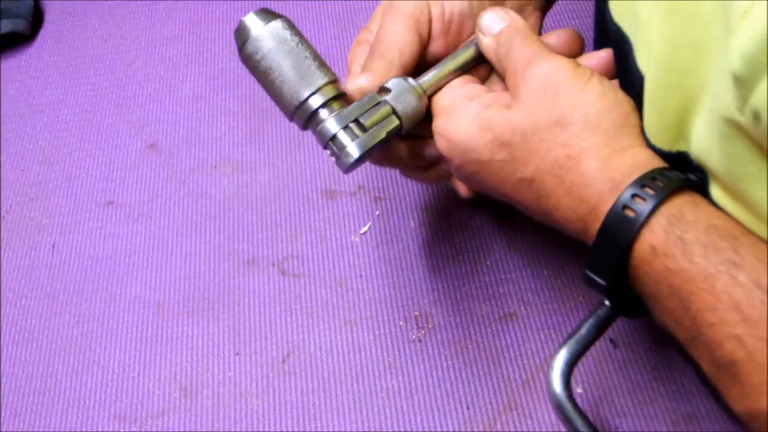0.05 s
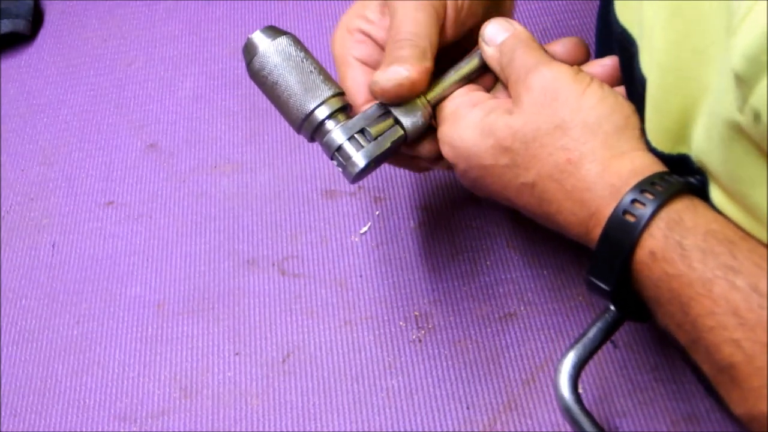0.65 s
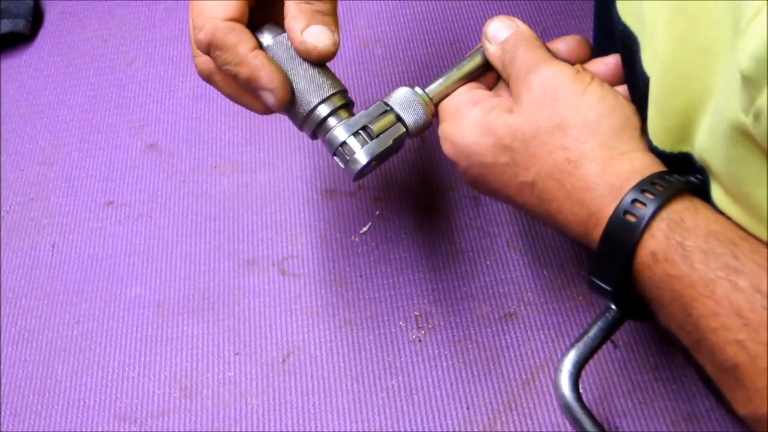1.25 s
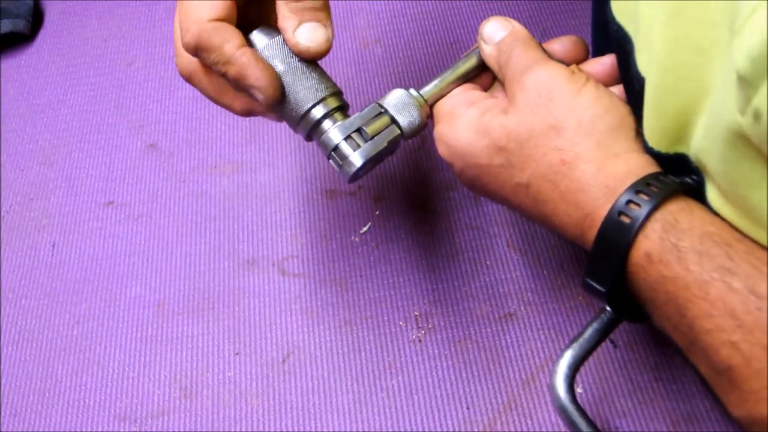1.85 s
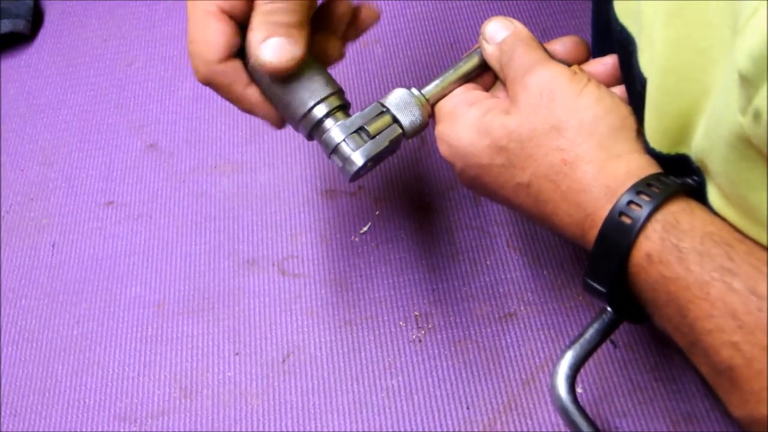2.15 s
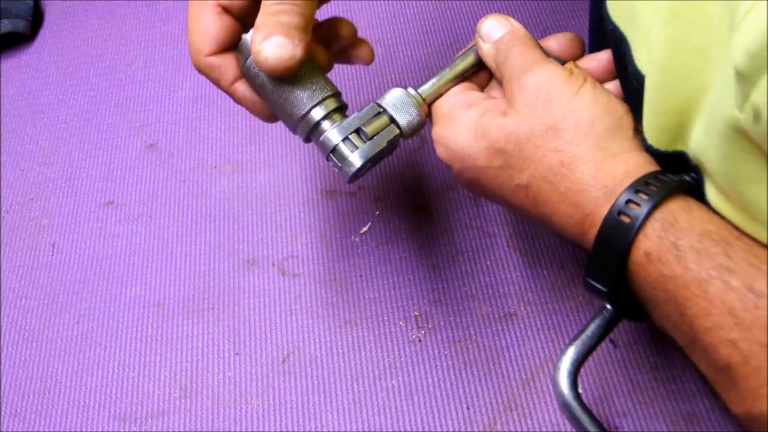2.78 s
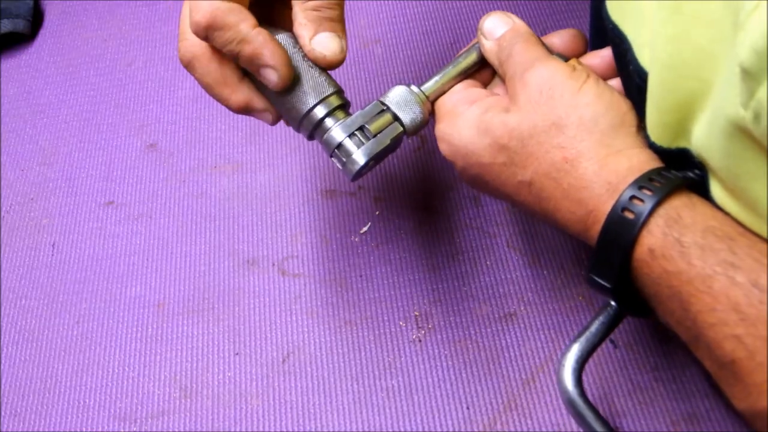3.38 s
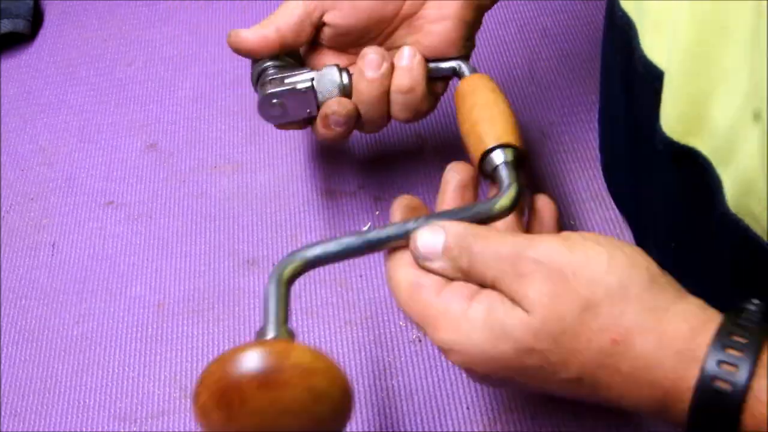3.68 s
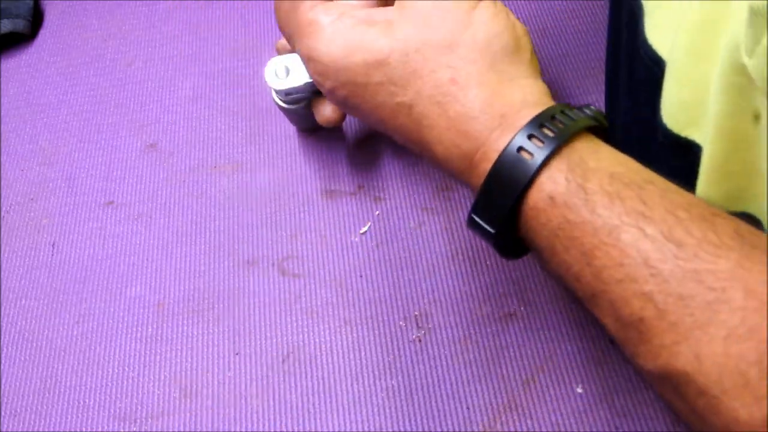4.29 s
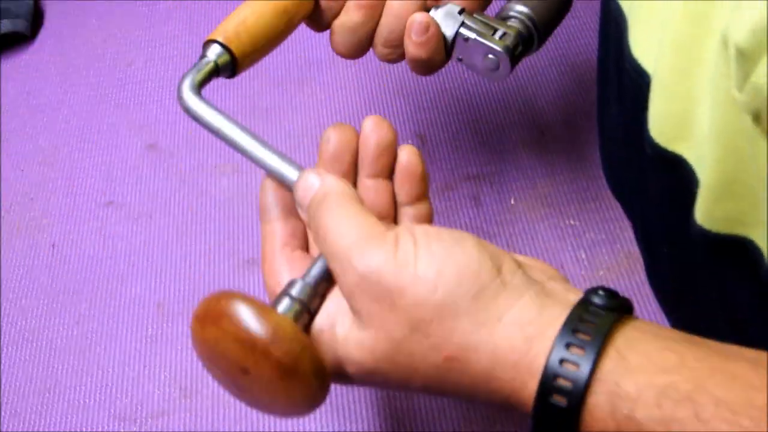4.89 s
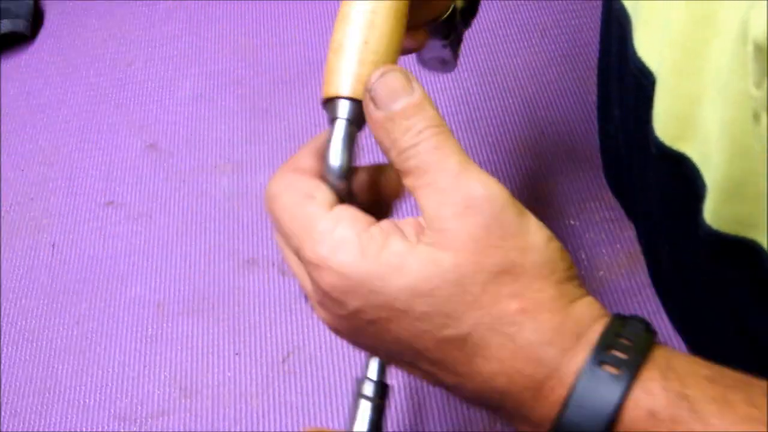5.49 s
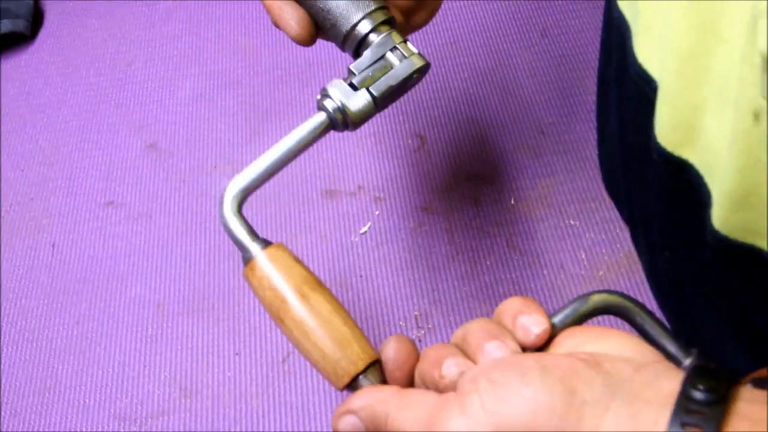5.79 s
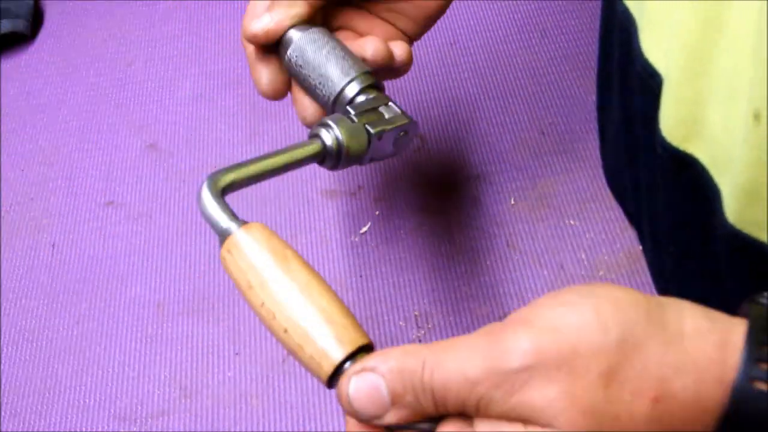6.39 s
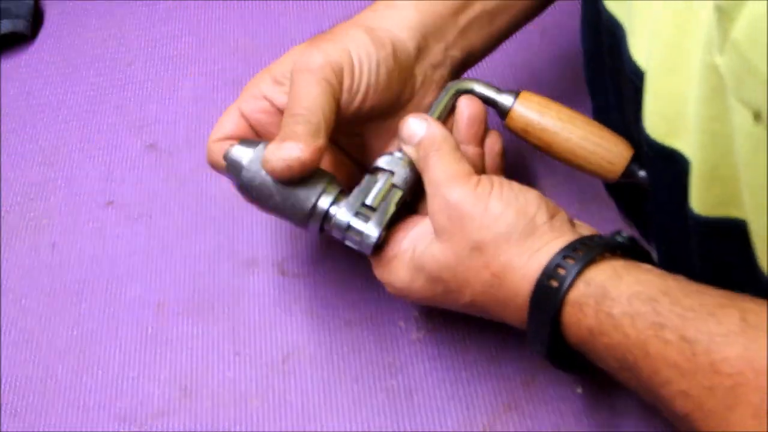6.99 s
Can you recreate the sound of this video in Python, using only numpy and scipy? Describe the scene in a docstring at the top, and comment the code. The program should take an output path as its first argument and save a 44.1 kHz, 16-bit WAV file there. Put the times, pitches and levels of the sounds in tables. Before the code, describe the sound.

Sharp metal ratchet clicks come in short groups as a hand brace is turned, followed by light, quick ticking in a quiet room.

```python
"""A quiet room hums and a faint clock beats while a hand turns the chuck of a hand brace.
Fingers rasp on the knurled shell, loose steel parts tick, and the pawl scrapes up ten teeth,
snapping off each one and setting the steel head ringing. A limiter flattens the snaps.
Halfway through, the scene jumps to four times the speed: hum and clock rise in pitch,
the beat races, and the handling becomes thin, dry ticking amid bouts of faint crackle."""
import sys
import numpy as np
from scipy import signal
from scipy.fft import rfft, irfft
from scipy.io import wavfile
from scipy.ndimage import uniform_filter1d

SR = 44100
rng = np.random.default_rng(int(sys.argv[2]) if len(sys.argv) > 2 else 0)


def store_wav(level_fs):
    """Save 16-bit WAV to argv[1]."""
    pcm = np.round(np.clip(np.atleast_2d(level_fs), -1, 1) * 32767)
    wavfile.write(sys.argv[1], SR, pcm.T.astype(np.int16))


N = 319725
JUMP_S, FAST_SPEED = 3.742, 4

# room tone before and after the jump: freq_hz, gain_db
AIR_EQ = [(15, -55), (25, -34), (59, -14.5), (326, -13), (394, -8), (427, -13), (516, -14.5), (911, -17.5),
          (1230, -19), (1560, -21), (2550, -23.5), (3820, -27), (7510, -31.5), (14000, -34), (16000, -40)]
FAST_AIR_EQ = [(15, -77), (25, -47.5), (249, -20), (270, -17), (301, -17), (489, -15), (575, -13),
               (624, -14.5), (911, -15.5), (1160, -14.5), (1330, -12.5), (1560, -13), (1940, -15.5),
               (4250, -19), (16000, -29)]
# how alike the room tone is left and right: freq_hz, correlation
AIR_CORRELATION = [(50, 0.35), (250, 0.28), (1000, 0.25), (4000, 0.057), (15000, 0.24)]
# mains hum at speed 1: pitch_hz, level_db
MAINS_HUM = [(200, -73.3), (300, -72.3), (399.8, -59)]
# palm strokes: start_s, length_s, level_db
BRUSHES = [(.02, .1, -55.5), (.69, 0.096, -56), (2.85, 0.09, -54.5)]
# resonances of the clock case at speed 1: pitch_hz, level_db
CLOCK_MODES = [(750, -57), (1075, -58)]
# finger strokes: start_s, length_s, rasp_db, hiss_db
RUBS = [(0.601, 0.02, -51.5, -76), (0.998, .02, -51, -77), (1.386, 0.059, -51, -53),
        (2.219, 0.04, -46, -63), (2.642, 0.028, -45, -50), (2.68, 0.067, -59, -68),
        (2.737, 0.1, -40.5, -60), (3.004, 0.018, -47, -78), (3.06, 0.14, -50.5, -58),
        (3.532, .1, -52.5, -71), (3.633, 0.12, -40, -56)]
# friction tone of palm, fingers, spindle and pawl: freq_hz, gain_db
BRUSH_EQ = [(1000, -20), (5000, -8), (10000, 4), (15000, 5)]
RASP_EQ = [(150, -25), (380, -8), (700, -4.5), (1150, -8.5), (1450, 2.5), (1700, -10), (2500, -10.5),
           (3600, -24), (6000, -26), (16000, -32)]
SPINDLE_EQ = [(3000, -18), (6200, -29), (7000, 8), (7800, 6), (8800, -5), (13000, -16), (13900, -17),
              (14800, -21)]
SCRAPE_EQ = [(500, -14), (1500, -4), (2800, -9), (3350, -5.5), (3900, -22), (6000, -14), (7300, -10),
             (9000, -16), (16000, -22)]
# thud, body, bite and sparkle bands of a steel hit: low_hz, high_hz
HIT_BANDS = [(110, 1200), (1200, 4000), (4000, 9000), (9000, 16500)]
# pan of each of those bands: left_over_right_db
BAND_PANS = [-5, -4.5, -0.5, -1.2]
# loose parts touching: start_s, bite_db, hardness_db (bare steel above 0, hand-muffled below)
TICKS = [(0.9876, -44, 3), (1.4021, -34.5, -3), (1.4218, -35, 9), (1.4276, -45, 9), (1.4464, -39.5, -9),
         (1.4541, -38.5, 6), (1.6032, -45.5, -5.5), (1.8923, -42.5, -27), (2.5276, -34, 7.5),
         (2.6547, -48, -26), (2.6922, -48.5, -27), (2.8932, -45, 0), (3.054, -38, 1), (3.5297, -48.5, -20),
         (3.5768, -44.5, -15), (3.5976, -62.5, -32), (3.7546, -28.5, 8), (3.7623, -40, -3),
         (3.793, -46, -9), (3.871, -50, -12), (4.6991, -43.5, -10), (4.743, -53, 10), (4.779, -49, -15),
         (4.817, -48, 9), (5.0793, -52, -37.5), (5.4495, -50, 12), (5.5797, -39.5, 7), (5.625, -39.5, 0),
         (5.666, -33.5, 7.5), (5.711, -45.5, 9), (6.0663, -40, 12), (6.312, -53.5, -11), (6.4205, -46.5, 7),
         (6.6378, -34, 6), (6.8024, -44.5, 10), (6.8279, -36.5, 2.5), (7.0212, -44, 4), (7.0736, -46, 1),
         (7.1544, -44, 7), (7.172, -43.5, 8.5)]
# tone of a tick and of its reverb, at normal and high speed: freq_hz, gain_db
TICK_EQ = [(150, -10), (700, 23), (1400, 17), (2050, 16.5), (2600, 17), (3200, 15), (4200, -1.5),
           (6000, -3), (7500, 4.5), (10800, -1), (13000, -6), (15500, -11)]
FAST_TICK_EQ = [(700, -0.5), (1400, 12.5), (2000, 23), (2600, 14.5), (3200, 13.5), (4200, -0.5),
                (6000, 4.5), (7500, 2), (10800, 3.5), (15500, 0.5)]
TICK_REVERB_EQ = [(300, -4.5), (2000, -5.5), (12000, -19.0)]
FAST_REVERB_EQ = [(300, -11.0), (2500, 9.0), (12000, -1.5)]
# pawl snaps: start_s, bite_db, thud_db, body_db, sparkle_db (these three relative to bite), ring_db
SNAPS = [(1.098, -6.5, -9.5, -8.5, -4, -65), (1.186, -8, -14, -9.5, -2, -46.5),
         (1.687, -6.5, -26, -7, 1, -39.5), (1.7518, -6.5, -26, -11, 2, -51),
         (1.8295, -6, -26, -10.5, -7, -37.5), (2.23, -11, -17.5, -4.5, -1, -44),
         (2.3074, -12, -18.5, -5, 3, -41), (2.3849, -3, -17.5, -7, -7, -37.5),
         (3.2623, -4.5, -20.5, -9.5, 2, -42), (3.3851, -4, -18.5, -11.5, 2.5, -53)]
# tone of a snap, what a tight grip adds to it, and its reverb: freq_hz, gain_db
SNAP_EQ = [(150, -3), (700, 3), (1100, 1.5), (1450, -4), (1900, -10), (2450, -1.5), (3150, 10), (3900, -12),
           (6000, -11), (7400, -1.5), (8700, -6.5), (9800, 4.5), (11800, 17.5), (12300, 12), (12900, 20),
           (13900, 20), (15000, 26), (15800, 30)]
TIGHT_GRIP_EQ = [(1100, -3.5), (1900, 5.5), (2450, 2), (3150, -8.5), (3900, 5)]
SNAP_REVERB_EQ = [(300, -42), (1400, 15), (2100, 16), (3100, 6.5), (4000, 12.5), (6000, 9.5),
                  (12000, 4), (14000, -4.5)]
# resonances of the steel head: pitch_hz, gain_db, t60_s
HEAD_MODES = [(1360, -7, .2), (1444, -4, .22), (2442, -6, .17), (2662, -2, .18), (2862, 2, .17),
              (2940, 0, .18), (3017, -1, .16), (3084, 0, .18), (3161, 1, .19), (3226, -2, .17),
              (7644, -3, .15), (8828, -6, .15), (8989, -4, .15), (10566, -3, .14), (11344, -3, .14),
              (11833, -2, .14)]
# jaws touching: start_s, pitch_hz, level_db
CLINKS = [(1.291, 3310, -54), (1.392, 3320, -52), (1.421, 3830, -46), (1.646, 3220, -55),
          (2.511, 3100, -50), (3.208, 3300, -58)]
# bouts of faint, bright crackle and stray knocks in the sped-up part: start_s, length_s, level_db
CRACKLE_BOUTS = [(3.76, 0.46, -72), (4.55, 0.29, -59.5), (5.4, 0.53, -69), (6.12, 0.37, -65),
                 (6.75, 0.67, -62.5)]
# tone of the crackle: freq_hz, gain_db
CRACKLE_EQ = [(500, -19), (3000, 0), (7000, -9), (11000, 0.5), (15000, -6.5)]


def amp(db):
    """Decibels to linear gain."""
    return 10 ** (np.asarray(db) / 20)


def unit(x):
    """Scales to rms 1."""
    return x / np.sqrt(np.mean(x ** 2) + 1e-20)


def curve_at(points, hz):
    """Reads a curve on a log-frequency axis."""
    freq_hz, value = np.transpose(points)
    return np.interp(np.log(hz + 1), np.log(freq_hz + 1), value)


def add(mix, start_s, sound):
    """Drops a sound into the mix."""
    part = mix[..., round(start_s * SR):][..., :sound.shape[-1]]
    part += sound[..., :part.shape[-1]]


def eq(x, points):
    """Shapes a steady sound with an EQ curve."""
    n = x.shape[-1]
    return irfft(rfft(x) * amp(curve_at(points, np.fft.rfftfreq(n, 1 / SR))), n)


def impulse_response(points, size=2048):
    """An EQ curve as a minimum-phase response, which keeps attacks sharp."""
    log_gain = np.log(amp(curve_at(points, abs(np.fft.fftfreq(size, 1 / SR)))))
    spectrum = np.exp(np.conj(signal.hilbert(log_gain)))
    return np.fft.ifft(spectrum).real[:size // 2]


def pan(x, left_db):
    """Sets the left channel left_db above the right."""
    return x * amp([[left_db / 2], [-left_db / 2]])


def swells(strokes):
    """Envelope with one soft hump for each start_s, length_s, level_db."""
    envelope = np.zeros(N)
    for start_s, length_s, level_db in strokes:
        add(envelope, start_s, amp(level_db) * signal.windows.tukey(round(length_s * SR), .7))
    return envelope


def grit(per_s, spread_db, hiss, width):
    """Stereo friction: tiny slips of uneven size over a smooth hiss."""
    slips = (rng.random(N) < per_s / SR) * rng.standard_normal(N)
    slips *= amp(spread_db * np.minimum(rng.exponential(1, N), 4))
    return unit(slips) + hiss * rng.standard_normal(N) + width * rng.standard_normal((2, N))


def reverb(x, t60_s, tone, onset_s, correlation, size=8192):
    """Dense room reflections that fade in quickly and die away."""
    t = np.arange(size) / SR
    left, other = rng.standard_normal((2, size))
    right = correlation * left + np.sqrt(1 - correlation ** 2) * other
    envelope = amp(-60 * t / t60_s) * (1 - np.exp(-(t / onset_s) ** 2))
    tail = eq(np.array([left, right]), tone) * envelope
    return signal.fftconvolve(x, unit(tail) / np.sqrt(size), axes=1)


def room_tone(tone, speed, air_db=-53):
    """A wide bed of air with mains hum; speed pitches the hum up."""
    left, other = rng.standard_normal((2, N))
    correlation = curve_at(AIR_CORRELATION, np.fft.rfftfreq(N, 1 / SR))
    right = irfft(correlation * rfft(left) + np.sqrt(1 - correlation ** 2) * rfft(other), N)
    t = speed * np.arange(N) / SR
    hum = sum(amp(db) * np.sqrt(2) * np.sin(2 * np.pi * (hz * t + rng.random())) for hz, db in MAINS_HUM)
    return amp(air_db) * unit(eq(np.array([left, right]), tone)) + hum


def palm_brush():
    """A palm slides over the steel with an airy swish."""
    friction = grit(per_s=3000, spread_db=2, hiss=1, width=.6)
    return swells(BRUSHES) * unit(eq(friction, BRUSH_EQ))


def tink(hz, level_db, decay_s, width=0.04, size=8192):
    """A light rattle excites one narrow resonance."""
    t = np.arange(size) / SR
    resonance = [(hz / 2, -30), (hz * (1 - width), -13), (hz, 0), (hz * (1 + width), -13),
                 (hz * 2, -30), (hz * 4, -50)]
    envelope = t / decay_s * np.exp(1 - t / decay_s)
    return amp(level_db) * envelope * unit(eq(rng.standard_normal(size), resonance))


def clock(start_s, end_s, speed):
    """Faint, even beats ring the clock's case; speed scales rate and pitch alike."""
    out = np.zeros(N)
    for beat_s in np.arange(start_s, end_s, 1.002 / speed):
        for hz, level_db in CLOCK_MODES:
            add(out, beat_s, tink(hz * speed, level_db, decay_s=0.014 / speed))
    return pan(out, left_db=-4.0)


def finger_rasp(slips_per_s=300, decay_s=.004, size=900):
    """Skin sticks and slips on the knurling; each slip briefly rings the hand-damped shell."""
    t = np.arange(size) / SR
    shell = (t == 0) + .06 * rng.standard_normal((2, size)) * np.exp(-t / decay_s)
    slips = (rng.random(N) < slips_per_s / SR) * rng.uniform(.4, 1.4, N)
    slips += .04 * rng.standard_normal(N)
    rasp = signal.fftconvolve(slips[None], shell, axes=1)[:, :N]
    envelope = swells([(start_s, length_s, rasp_db) for start_s, length_s, rasp_db, _ in RUBS])
    return envelope * unit(eq(rasp, RASP_EQ))


def spindle_hiss():
    """The spindle hisses thinly in its bearing with each finger stroke."""
    friction = grit(per_s=1700, spread_db=11, hiss=0.95, width=0.67)
    envelope = swells([(start_s, length_s, hiss_db) for start_s, length_s, _, hiss_db in RUBS])
    return envelope * unit(eq(friction, SPINDLE_EQ))


def steel_hit(levels, response, chatter, decay_s, width, size=1500):
    """Steel meets steel: a sharp click and bright, dying chatter, balanced in four bands."""
    bite_db, thud_db, body_db, sparkle_db = levels
    t = np.arange(size) / SR
    rattle = rng.standard_normal((2, size)) * np.exp(-t / decay_s) * np.sqrt(2 / (decay_s * SR))
    mid, side = signal.sosfilt(signal.butter(1, 2500, "highpass", fs=SR, output="sos"), rattle)
    blow = (t == 0) + chatter * mid + width * np.array([side, -side])
    blow = signal.fftconvolve(blow, response[None])[:, :size]
    out = 0
    for edges_hz, band_db, left_db in zip(HIT_BANDS, [thud_db, body_db, 0, sparkle_db], BAND_PANS):
        band = signal.sosfilt(signal.butter(3, edges_hz, "bandpass", fs=SR, output="sos"), blow)
        out = out + amp(bite_db + band_db) * pan(unit(band), left_db)
    return out * np.sqrt(0.0021 * SR / size)  # each band has the energy of 2.1 ms at its level


def loose_ticks():
    """Loose jaws and the ratchet collar tick; at high speed they are thinner, with a shorter tail."""
    out = np.zeros((2, N))
    response, fast_response = impulse_response(TICK_EQ), impulse_response(FAST_TICK_EQ)
    for start_s, bite_db, hardness_db in TICKS:
        # harder contacts have less body and more sparkle
        body_db, sparkle_db = -3.5 - 0.43 * hardness_db, -7 + hardness_db
        if start_s < JUMP_S:
            levels = (bite_db, body_db - 10, body_db, sparkle_db)
            tick = steel_hit(levels, response, chatter=1.0, decay_s=0.0022, width=0.34)
            tail = amp(-7) * reverb(tick, t60_s=.072, tone=TICK_REVERB_EQ, onset_s=.00031, correlation=1)
        else:
            levels = (bite_db, body_db - 24, body_db, sparkle_db)
            tick = steel_hit(levels, fast_response, chatter=4.3, decay_s=0.002, width=1.0)
            tail = amp(-9) * reverb(tick, t60_s=.056, tone=FAST_REVERB_EQ, onset_s=.00097, correlation=1)
        add(out, start_s, tick)
        add(out, start_s, tail)
    return pan(out, left_db=-2.0)


def pawl_scrapes(lead_s=0.06, length_s=0.063, level_db=-52):
    """Leading into each snap, the pawl rides up a tooth and makes the head sing faintly."""
    friction = grit(per_s=1500, spread_db=2, hiss=.7, width=.4)
    envelope = swells([(snap_s - lead_s, length_s, level_db) for snap_s, *_ in SNAPS])
    return envelope * unit(eq(friction, SCRAPE_EQ))


def steel_ring(modes, size=6500):
    """Struck steel rings; each blow lands on another spot, which rebalances the modes."""
    hz, gain_db, t60_s = np.transpose(modes)[:, :, None]
    t = np.arange(size) / SR
    strike_db = 3 * rng.standard_normal(hz.shape)
    envelopes = amp(gain_db + strike_db - 60 * t / t60_s)
    partials = np.sin(2 * np.pi * (hz * t + rng.random(hz.shape)))
    return unit((envelopes * partials).sum(0))


def pawl_snaps(slip_s=0.0014, land_delay_s=0.00077, free_ring_db=-41.5, held_ring_db=-63):
    """The pawl slips off a tooth, lands on the next and rings the head; the room answers each blow."""
    out, reverb_send = np.zeros((2, N)), np.zeros((2, N))
    # the crowded upper modes of the head
    shimmer = steel_ring([(hz, 0, .15) for hz in rng.uniform(6500, 15600, size=120)])
    for start_s, bite_db, thud_db, body_db, sparkle_db, ring_db in SNAPS:
        land_s = start_s + land_delay_s
        levels = (bite_db, thud_db, body_db, sparkle_db)
        # a weaker ring means a tighter grip, which also colours the snap
        grip = np.clip((free_ring_db - ring_db) / (free_ring_db - held_ring_db), 0, 1)
        response = impulse_response([(hz, db + grip * curve_at(TIGHT_GRIP_EQ, hz)) for hz, db in SNAP_EQ])
        slip = amp(-21) * steel_hit(levels, response, chatter=0.53, decay_s=0.002, width=1.0)
        add(out, land_s - slip_s, slip)
        add(out, land_s, steel_hit(levels, response, chatter=1.15, decay_s=.001, width=.2))
        add(out, land_s, amp(ring_db) * pan(steel_ring(HEAD_MODES), left_db=-5))
        add(out, land_s, amp(bite_db - 33) * shimmer)
        add(reverb_send, land_s, steel_hit(levels, response, chatter=0, decay_s=.001, width=0))
    tail = reverb(reverb_send, t60_s=0.17, tone=SNAP_REVERB_EQ, onset_s=0.0007, correlation=0.73)
    return out + amp(-10.5) * tail[:, :N]


def jaw_clinks():
    """The jaws touch lightly as the fingers take a new hold."""
    out = np.zeros(N)
    for start_s, hz, level_db in CLINKS:
        add(out, start_s, tink(hz, level_db, decay_s=0.0065))
    return pan(out, left_db=-4.0)


def fast_crackle():
    """Bouts of faint, bright crackle and stray knocks in the sped-up part."""
    crackle = unit(eq(grit(per_s=70, spread_db=0, hiss=.25, width=.2), CRACKLE_EQ))
    knocks = unit(eq(grit(per_s=25, spread_db=0, hiss=.25, width=.2), FAST_TICK_EQ))
    return swells(CRACKLE_BOUTS) * pan(crackle + amp(-3) * knocks, left_db=-2.5)


def scene():
    """The brace up front, over room tone and clock at normal and then high speed."""
    normal_bed = pan(room_tone(AIR_EQ, speed=1), left_db=-0.5)
    fast_bed = pan(room_tone(FAST_AIR_EQ, FAST_SPEED), left_db=-0.7)
    bed = np.where(np.arange(N) < JUMP_S * SR, normal_bed, fast_bed)
    brace = pawl_snaps() + loose_ticks() + jaw_clinks()
    brace += pan(finger_rasp() + spindle_hiss() + palm_brush(), left_db=-3.5)
    brace += pawl_scrapes()
    crackle = fast_crackle()
    beats = clock(start_s=.07, end_s=JUMP_S, speed=0.99)
    beats += clock(start_s=4.004, end_s=N / SR, speed=FAST_SPEED)
    return bed + beats + brace + crackle


def peak_hold(over_db, release_db_per_s):
    """Follows each rise at once and lets go at a steady rate."""
    fall_db = np.arange(N) * release_db_per_s / SR
    return np.maximum.accumulate(over_db + fall_db) - fall_db


def record(dry, threshold_db=-18, slope=0.78, slow_share=0.38, cutoff_hz=15850):
    """A look-ahead limiter with a quick release and a smaller slow one, then a steep low-pass."""
    power_db = 10 * np.log10(abs(uniform_filter1d((dry ** 2).mean(0), size=88)) + 1e-12)
    over_db = slope * np.maximum(power_db - threshold_db, 0)
    quick_db = peak_hold(over_db, release_db_per_s=325)
    slow_db = peak_hold(over_db, release_db_per_s=19.5)
    duck_db = (1 - slow_share) * quick_db + slow_share * slow_db
    ducked = dry / amp(uniform_filter1d(duck_db, size=40))
    lowpass = signal.firwin(255, cutoff_hz, window=("kaiser", 7), fs=SR)
    return signal.oaconvolve(ducked, lowpass[None], "same")


dry = scene()
out = record(dry)
store_wav(out)
```